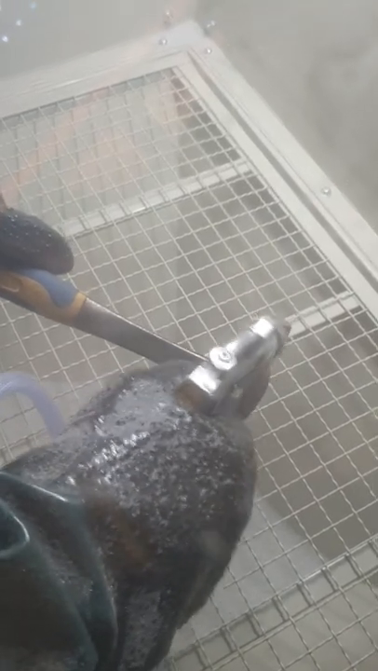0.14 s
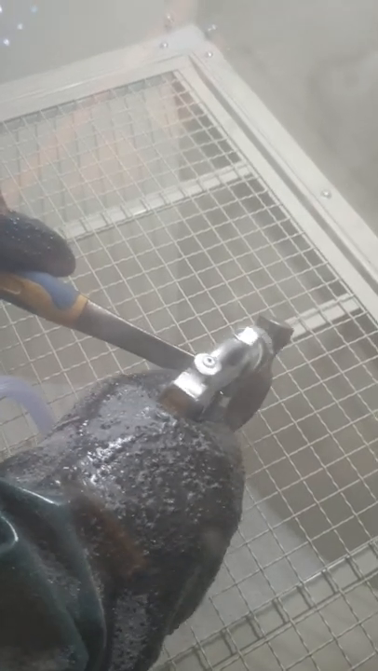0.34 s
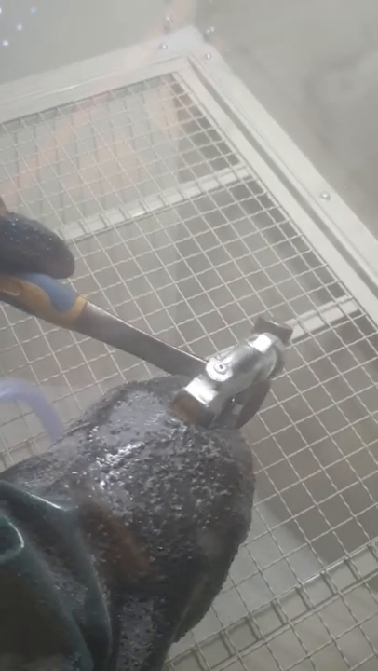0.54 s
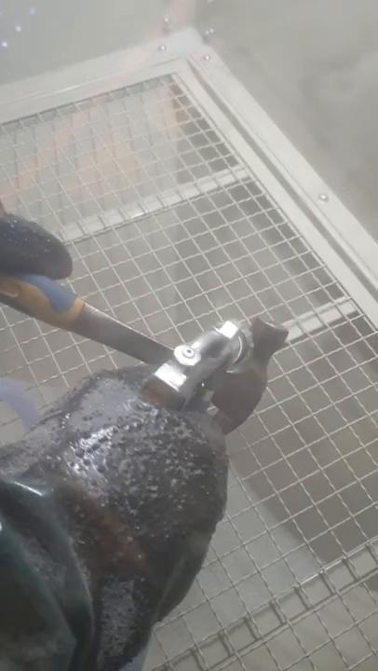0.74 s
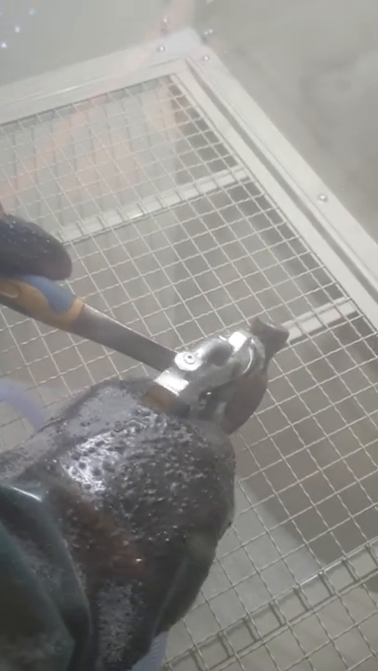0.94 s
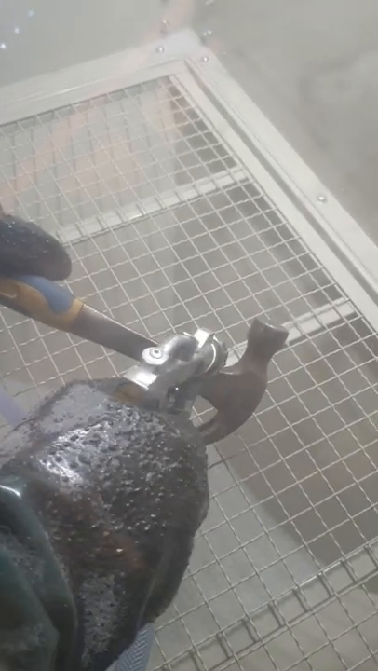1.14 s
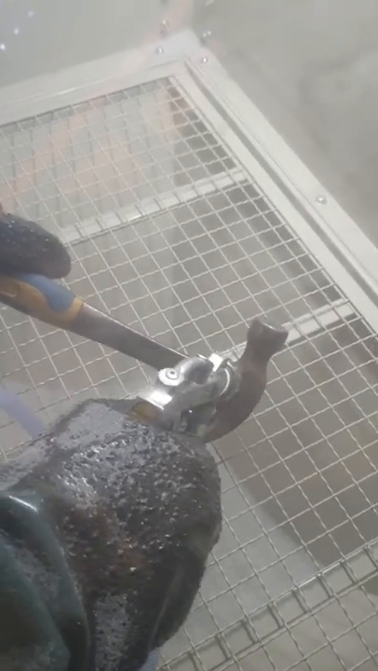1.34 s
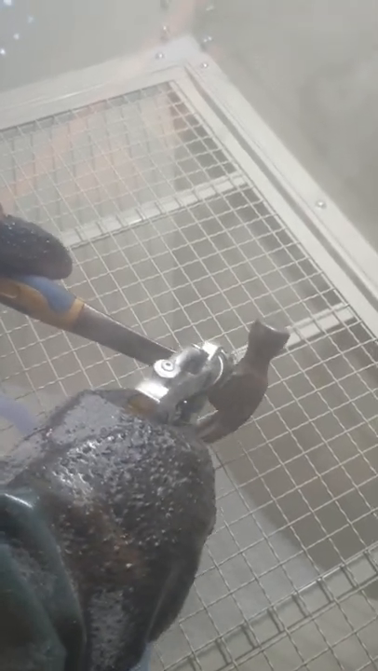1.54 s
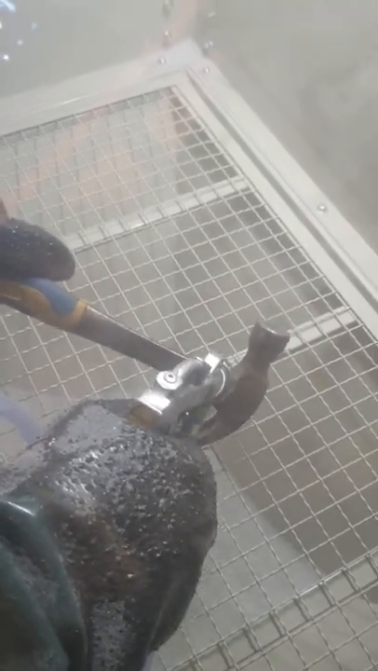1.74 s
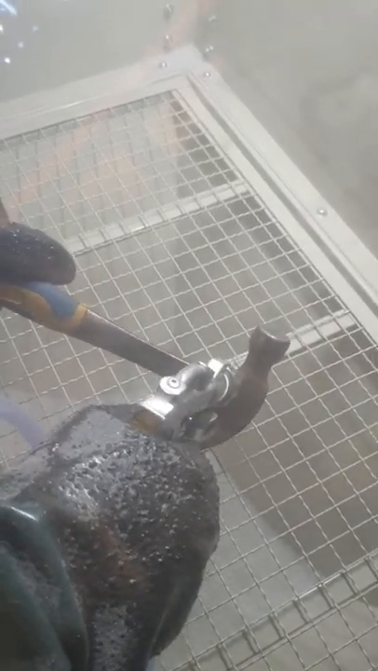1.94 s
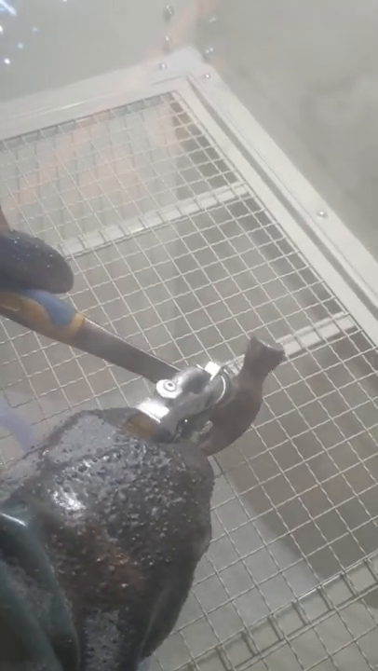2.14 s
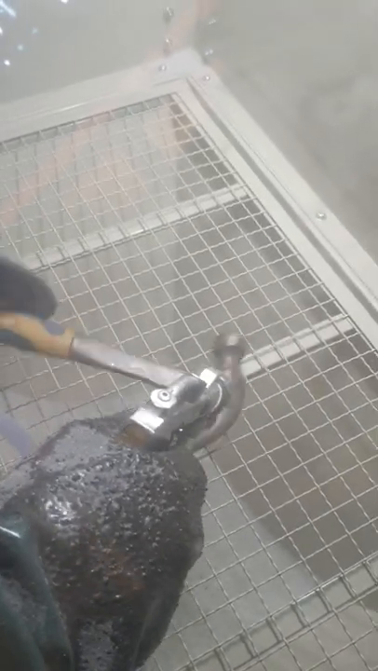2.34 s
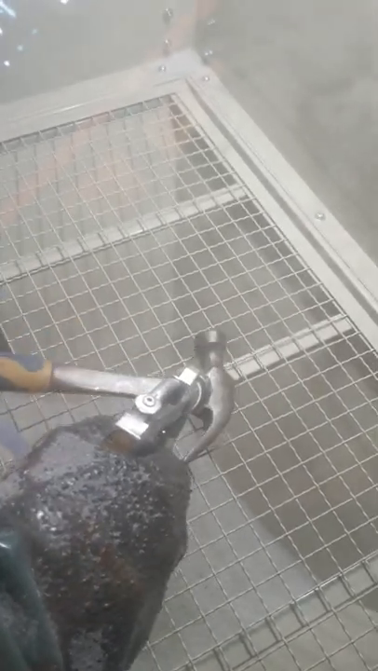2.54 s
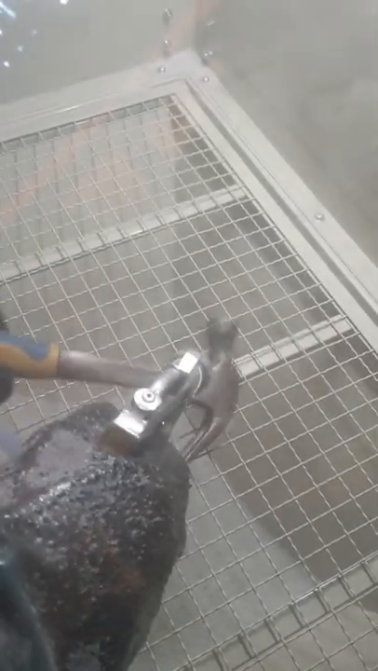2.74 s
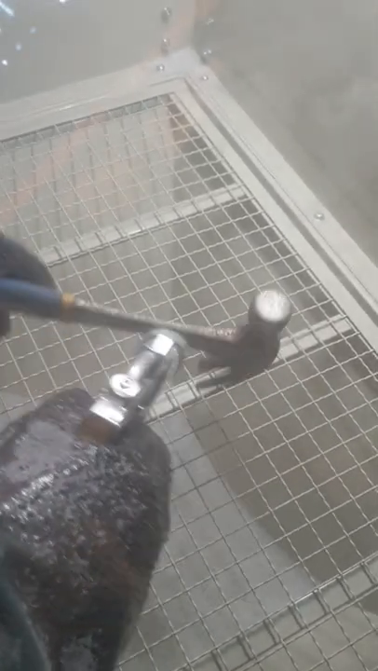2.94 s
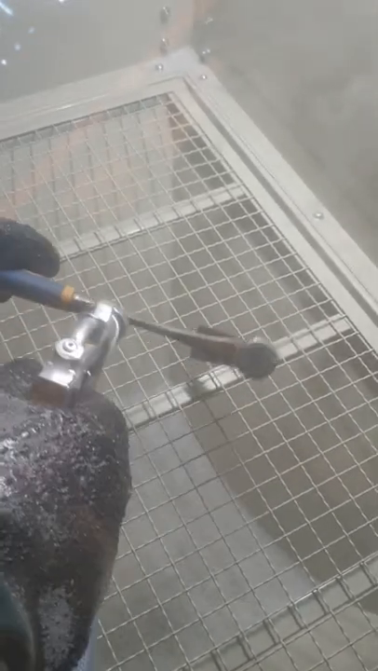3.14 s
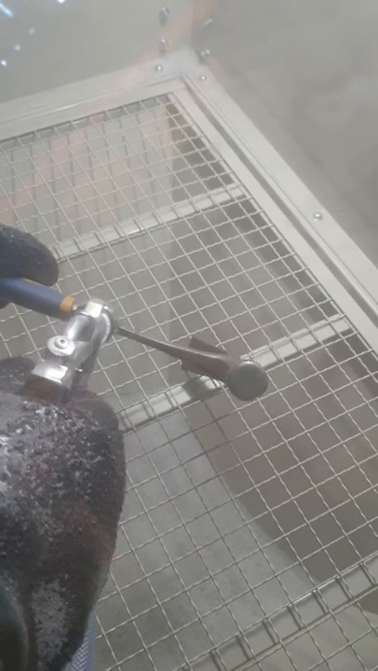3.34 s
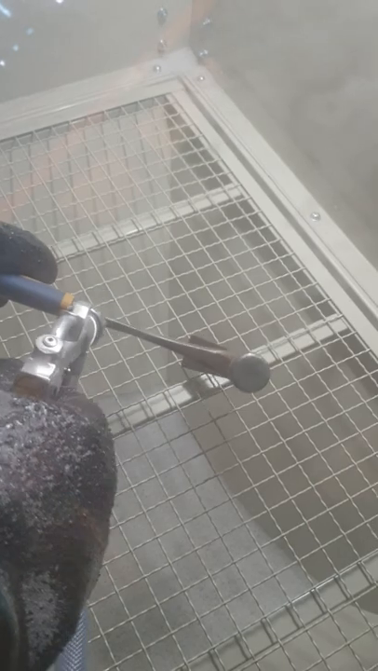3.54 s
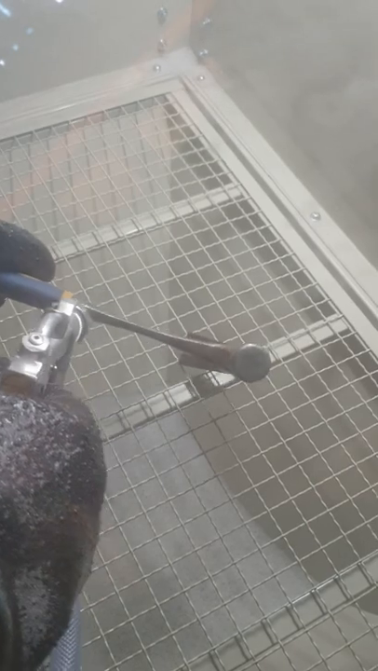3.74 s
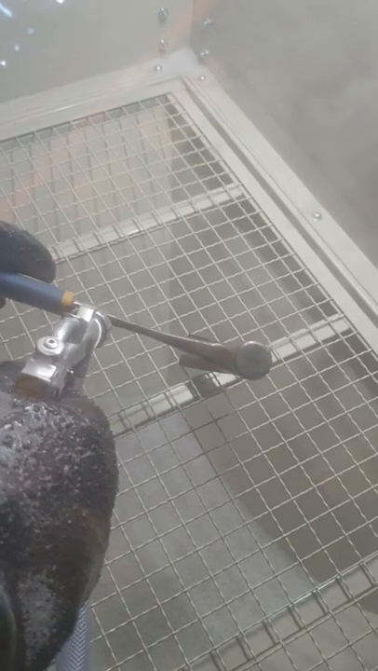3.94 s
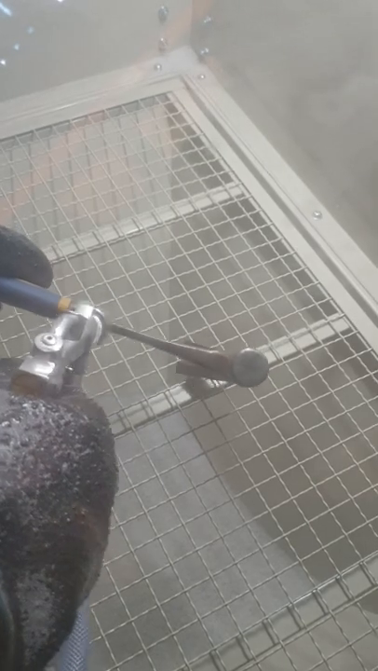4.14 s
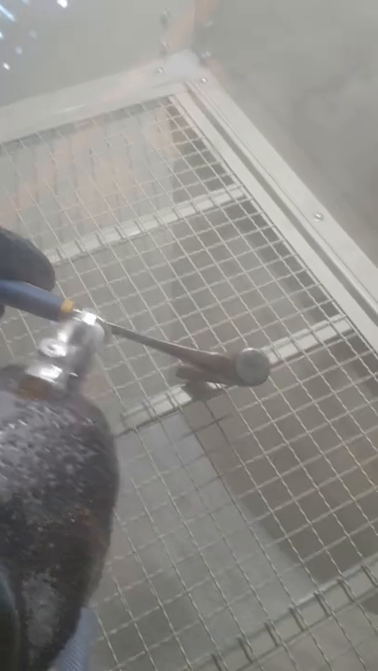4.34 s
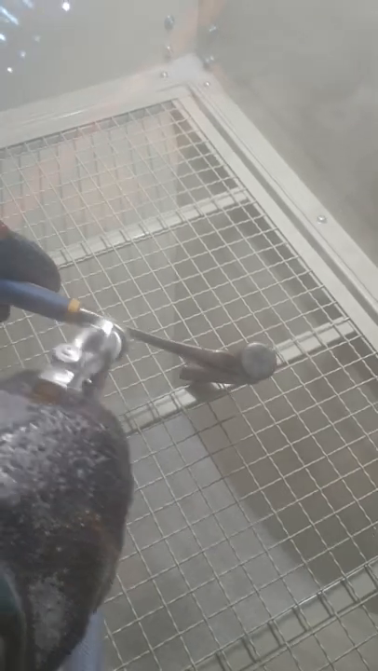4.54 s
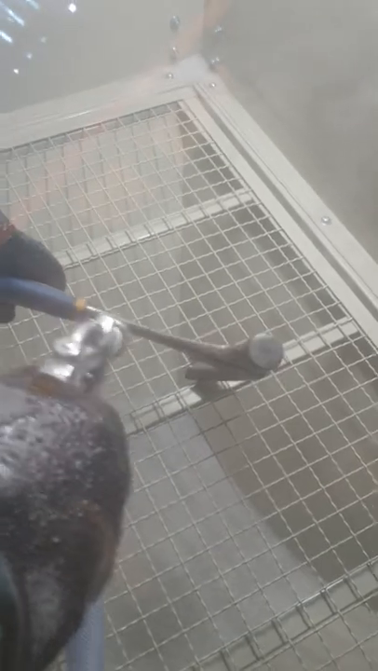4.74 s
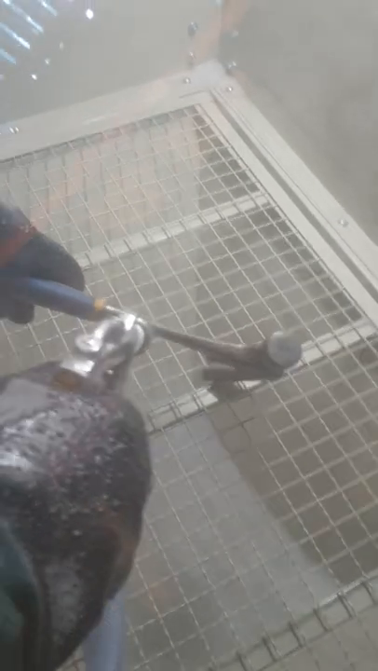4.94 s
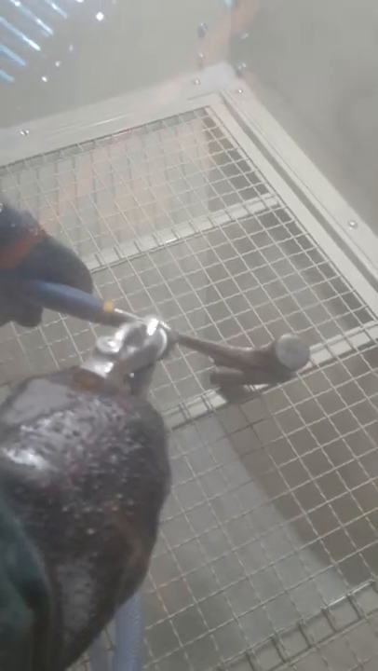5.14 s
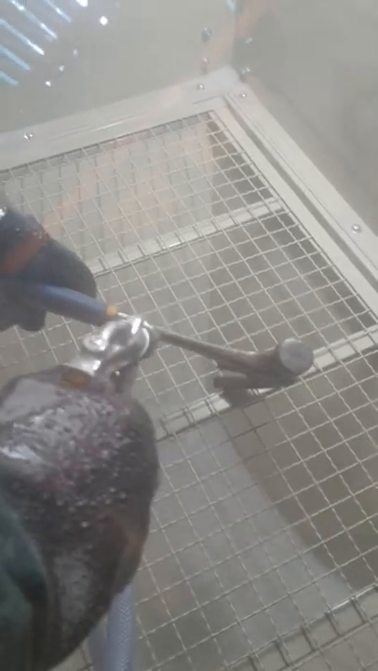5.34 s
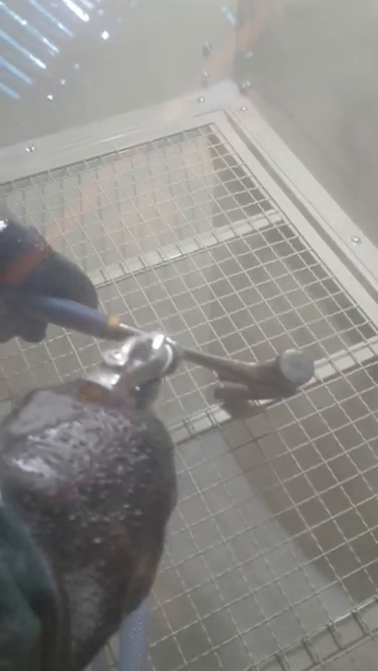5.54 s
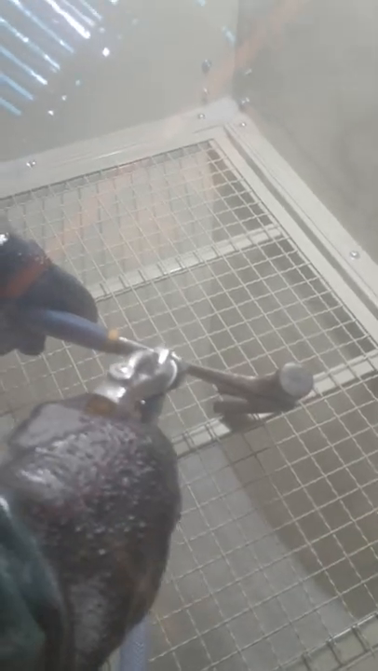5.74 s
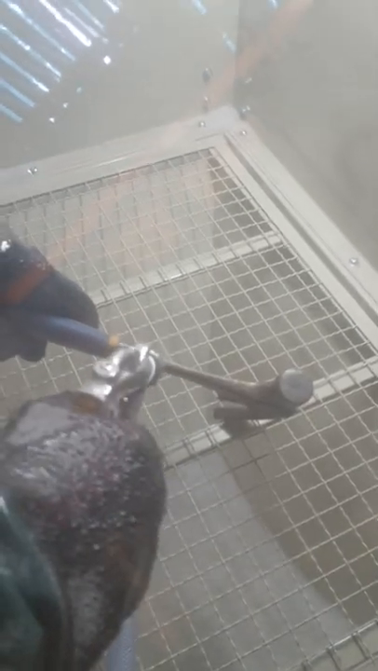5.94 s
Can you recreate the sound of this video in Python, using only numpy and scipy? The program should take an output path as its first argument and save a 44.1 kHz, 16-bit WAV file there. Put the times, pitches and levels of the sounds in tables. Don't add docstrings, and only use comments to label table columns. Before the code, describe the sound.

Inside a sheet-metal blasting cabinet, compressed air and grit hiss brightly in uneven surges against a steel hammer. The gun shuts off just after two seconds; the hammer thuds and clatters on the grate, panels boom and loose grit trickles. About a second later the blast snaps back. Close stereo phone pickup, treble-heavy, short metallic reverberation.

```python
import sys
import numpy as np
from scipy import signal
from scipy.fft import rfft, irfft, next_fast_len
from scipy.io import wavfile
from scipy.ndimage import uniform_filter1d

SR = 44100
rng = np.random.default_rng(int(sys.argv[2]) if len(sys.argv) > 2 else 0)


def how_loud(loudness_db):
    steps = np.asarray(loudness_db, float) / 20
    return 10 ** steps


def transcribe(signal):
    frames = np.atleast_2d(signal).T
    limited = np.clip(frames, -1, 1)
    pcm = np.round(limited * 32767).astype(np.int16)
    wavfile.write(sys.argv[1], SR, pcm)


N = 264151

# (frequency [Hz], density [dB per Hz])
HISS_SPECTRUM = [(4400, -46), (7500, -8), (9000, -3), (10500, 4.5), (12300, 13), (13500, 13.5), (14500, 10),
                 (15200, 13), (15650, 10.5), (15900, 3.5)]


def unit(x):
    return x / np.sqrt(np.mean(x ** 2) + 1e-20)


def along(points, hz):
    f, v = np.transpose(points)
    return np.interp(np.log(hz + 1), np.log(f + 1), v)


def curves(rows):
    s, *cols = np.transpose(rows)
    return [np.interp(np.arange(N) / SR, s, c) for c in cols]


def filtered(x, response, ring_s=0.25):
    m = next_fast_len(N + int(ring_s * SR))
    return irfft(rfft(x, m) * response(np.fft.rfftfreq(m, 1 / SR)), m)[..., :N]


def coloured(x, spectrum):
    return unit(filtered(x, lambda hz: how_loud(along(spectrum, hz))))


def drift(shape, bins, frames):
    field = uniform_filter1d(rng.standard_normal(shape), size=bins, axis=0)
    return unit(uniform_filter1d(field, size=frames, axis=1))


def patchy(depth_db, channels=1):
    z = signal.stft(rng.standard_normal((channels, N)), nperseg=512)[2]
    patches = drift(z.shape[1:], bins=8, frames=12)
    streaks = drift(z.shape[1:], bins=2, frames=24)
    gain_db = depth_db * (0.7 * patches + 0.8 * streaks)
    return signal.istft(z * how_loud(gain_db), nperseg=512)[1][:, :N]


def grains(per_s, spread_db):
    hit = rng.random(N) < per_s / SR
    size = np.minimum(rng.exponential(size=N), 4)
    return unit(hit * how_loud(spread_db * size) * rng.standard_normal(N))


def swells(rows, own=0, steady_db=-120):
    t, rows = np.arange(0, N + 64, 64) / SR, np.array(rows)
    s, db, rise_s, fall_s = rows[:, :4, None].transpose(1, 0, 2)
    below_db = 10 * np.where(t < s, (s - t) / np.abs(rise_s), (t - s) / np.abs(fall_s))
    each_db = db + own * rows[:, -1:] - below_db
    power = np.interp(np.arange(N) / SR, t, (how_loud(each_db) ** 2).sum(axis=0))
    return 10 * np.log10(power + how_loud(steady_db) ** 2)


def box(x, direct_db):
    # (frequency [Hz], t60 [s])
    cabinet_t60 = [(500, 0.39), (3000, 0.17), (12000, 0.19)]
    hz, t, z = signal.stft(rng.standard_normal((2, SR // 3)), SR, nperseg=256)
    decay_db = -60 * t / along(cabinet_t60, hz)[:, None]
    tail = signal.istft(z * how_loud(decay_db), SR, nperseg=256)[1]
    tail = tail / np.linalg.norm(tail, axis=1, keepdims=True)
    tail[:, 0] += how_loud(direct_db)
    tail = tail / np.linalg.norm(tail, axis=1, keepdims=True)
    return signal.fftconvolve(x[None], tail, axes=1)[:, :N]


def spray(spectrum, level_db, patchy_db, per_s, grain, compact, direct_db):
    noise = patchy(patchy_db, channels=3) + grain * grains(per_s, spread_db=1.6)
    point, *spread = coloured(noise, spectrum)
    gains = how_loud(np.atleast_2d(level_db))
    echoed = sum(box(gain * point, direct_db) for gain in gains)
    return np.sqrt(compact) * echoed + np.sqrt(1 - compact) * gains.sum(axis=0) * np.array(spread)


def panels(x):
    # (frequency [Hz], level [dB], t60 [s])
    panel_modes = [(57.73, 4, 1.66), (77.4, -8.5, 0.57), (86.5, -4, 0.96), (104.6, -0.5, 0.2),
                   (120, -3, 0.23), (164.3, -12.5, 0.9), (195, -11, 0.37), (227.4, -5.5, 0.3),
                   (259.2, 3.5, 0.36), (287, -2.5, 0.22), (340.4, -4, 0.43), (398, -10.5, 0.59),
                   (467, -9.5, 0.49), (492.3, -7.5, 0.46), (595, -16, 0.19), (697.5, -9, 0.084),
                   (819, -2, 0.17), (920, -5, 0.2), (1196, -7, 0.21)]
    shape = (len(panel_modes), 2, 1)
    tint = how_loud(rng.normal(0, 1.8, shape)) * np.exp(0.45j * rng.standard_normal(shape))

    def response(hz):
        low = hz[:len(hz) // 4]
        total = np.zeros((2, len(low)), complex)
        for (mode_hz, db, t60_s), port_tint in zip(panel_modes, tint):
            width_hz = np.log(1000) / (np.pi * t60_s)
            resonance = 20 * mode_hz / (mode_hz ** 2 - low ** 2 + 1j * low * width_hz)
            total += port_tint * how_loud(db) * resonance
        return np.pad(total, ((0, 0), (0, len(hz) - len(low))))

    return filtered(x, response, ring_s=2)


def workshop():
    # (frequency [Hz], level [dB])
    hall_spectrum = [(240, -31), (400, -26), (720, -6.5), (1800, -27), (2300, -19.5), (3500, -43.5),
                     (5300, -26.5), (8600, -43.5), (12000, -40), (15000, -43.5), (15900, -51)]
    return how_loud(-61) * coloured(patchy(1.2, channels=2), hall_spectrum)


def dust():
    # (frequency [Hz], level [dB])
    sand_spectrum = [(350, -28), (600, -17.5), (856, -12.5), (968, -18), (1140, -14.5), (1500, -25.5),
                     (1560, -32), (1840, -22), (3050, -29), (5410, -28.5), (8970, -46.5), (12100, -42),
                     (15700, -46)]
    # (peak time [s], level [dB], 10 dB rise [s], 10 dB fall [s], fine dust over it [dB])
    trickle_rows = [
        (2.3, -54, .08, .15, -8),
        (2.433, -42, .01, .07, -6),
        (2.503, -52, .004, .02, 0),
        (2.556, -45, .025, .12, -15),
        (2.66, -50, .01, .07, -14),
        (2.801, -44, .004, .08, -20),
        (2.93, -61, .06, .1, -22),
        (3.174, -63, .002, .05, 7),
    ]
    coarse = [p for p in sand_spectrum if p[0] < 9000] + [(11000, -96.0)]
    sand_db = swells(trickle_rows) + 0.1
    fine_db = swells(trickle_rows, own=0.86) + 0.1
    sand = spray(coarse, sand_db, patchy_db=-4.0, per_s=430, grain=0.27, compact=0.35, direct_db=-1.0)
    fine = spray(HISS_SPECTRUM, fine_db, patchy_db=-1.5, per_s=1200, grain=0.38, compact=0.3, direct_db=6)
    return sand + fine


def rumble():
    # (frequency [Hz], level [dB])
    low_spectrum = [(15, -37), (28, 5), (59, 4), (263, -6.5), (362, -16.5), (397, -12.5), (430, -16.5),
                    (525, -25.5), (600, -18.5), (780, -30.5), (1320, -120)]
    # (peak time [s], level [dB], 10 dB rise [s], 10 dB fall [s])
    shove_rows = [
        (1.85, -40, 1, -4),
        (2.22, -36, -0.2, 0),
        (2.48, -23.5, 0, 0.2),
        (2.7, -33.5, 0.26, 0.36),
        (3.5, -41, 0.7, 0.4),
    ]
    shake_db = swells(shove_rows, steady_db=-43.5)
    a, b = patchy(0.7, channels=2)
    plain = coloured(np.array([a + 0.31 * b, a - 0.14 * b]), low_spectrum)
    ringing = panels(rng.standard_normal(N))
    ringing = unit(filtered(ringing, lambda hz: 1j * hz / (60 + 1j * hz) / (1 + 1j * hz / 500) ** 2))
    return how_loud(shake_db) * unit(plain + 0.6 * ringing)


def knocks():
    # (time [s], boom level [dB], clack over boom [dB], contact [ms])
    knock_rows = [(1.792, -41, 5, 0.37), (2.185, -32, -5, 0.84), (2.431, -24.5, 5, 0.42),
                  (2.440, -13, -17, 0.93), (2.448, -12.5, -22, 1.12), (2.549, -23.5, -5, 0.88),
                  (2.61, -23, -12, 1.6), (2.659, -24, -12, 1.24), (2.69, -32, -21, 1.3),
                  (2.797, -35, -7, 1.18), (2.819, -33.5, -1.5, 1.2), (2.949, -41, -6, 2.4)]
    push, clack = np.zeros(N + SR), np.zeros(N + SR)
    t = np.arange(SR // 4) / SR
    for s, boom_db, clack_db, contact_ms in knock_rows:
        ms = max(contact_ms, 0.3)
        u = t / (ms / 1000)
        start = round(s * SR)
        push[start:][:len(t)] += how_loud(boom_db) * u * np.exp(1 - u) / ms
        envelope = how_loud(boom_db + clack_db - 60 * t / 0.14) * (1 - np.exp(-t / 0.0039))
        clack[start:][:len(t)] += envelope * rng.standard_normal(len(t))

    def grate_tone(hz):
        resonance = 1 / (1 + 1j * hz / 1000 - (hz / 1150) ** 2)
        return resonance ** 2 * (1j * hz / (200 + 1j * hz))

    tone = filtered(clack[:N], grate_tone)
    return how_loud(8.5) * panels(push[:N]) + how_loud(8) * box(tone, direct_db=3.5)


def valve(pulled_s, let_go_s):
    open_db_per_s, shut_db_per_s = 1700, 520
    bleed_db, bleed_db_per_s, bleed_s = -22, 28, 0.225
    t = np.arange(N) / SR
    after = np.maximum(t - let_go_s, 0)
    bleed = bleed_db - bleed_db_per_s * after - shut_db_per_s * np.maximum(after - bleed_s, 0)
    shutting = np.maximum(-shut_db_per_s * after, bleed)
    opening = np.minimum(open_db_per_s * (t - pulled_s), 0)
    return np.maximum(shutting + opening, -120)


def gun():
    # (frequency [Hz], level [dB])
    grit_spectrum = [(2530, -29.5), (4300, -1), (4550, -4.5), (5130, -1), (6000, -2.5), (7560, -7),
                     (8500, -15), (11000, -62), (18700, -120)]
    # (frequency [Hz], level [dB])
    grate_spectrum = [(1120, -24), (1900, -12.5), (2310, -8), (2490, 1), (2690, -2.5), (3110, -0.5),
                      (3210, -4), (3690, 0.5), (4200, -2.5), (5460, -17), (9240, -120)]
    # (frequency [Hz], level [dB])
    roar_spectrum = [(240, -28.5), (400, -3), (506, -10.5), (645, -12.5), (728, -7), (777, -7), (922, -2.5),
                     (1250, -5), (1780, -7.5), (2200, -5), (2860, -17.5), (4840, -120)]
    # (fully pulled [s], let go [s])
    trigger_pulls = [
        (-.1, 2.194),
        (3.232, 6.2),
    ]
    # (time [s], rebound off metal [dB], into the hollow [dB])
    aim_points = [(0, -0.6, -0.5), (0.29, -1.5, 1.0), (0.82, -2.1, 1.7), (1.17, -0.5, 2.9),
                  (1.24, -9.7, 3.0), (1.49, 1.6, -1.3), (1.59, -1.0, 4.1), (1.89, 4.6, 0.6),
                  (2.2, 0.9, 3.4), (3.3, -2.7, 0.2), (3.45, -1.0, 1.6), (3.49, 3.4, 0.4), (4.15, 2.5, -0.5),
                  (4.21, -0.2, 2.0), (4.51, 1.9, -1.6), (5.22, 1.5, -2.6), (5.61, 2.1, -2.9),
                  (5.99, 4.3, -4.5)]
    # (peak time [s], hiss level [dB], last 10 dB of rise [s], first 10 dB of fall [s],
    # grate over hiss [dB])
    slug_rows = [(0.201, -30.7, 0.297, 0.292, -15.0), (0.33, -28.1, 0.027, 0.058, -8.9),
                 (0.551, -22.2, 0.108, 0.127, -12.1), (0.792, -22.1, 0.167, 0.226, -10.4),
                 (0.917, -24.8, 0.102, 0.194, -17.5), (1.095, -28.5, 0.032, 0.243, -5.6),
                 (1.363, -36.2, 0.048, 0.082, 1.6), (1.449, -27.9, 0.142, 0.125, -16.3),
                 (1.515, -34.2, 0.019, 0.032, -0.2), (1.675, -24.4, 0.057, 0.06, -6.9),
                 (1.953, -23.5, 0.03, 0.056, -7.9), (2.17, -30.5, 0.006, 0.047, -5.7),
                 (3.249, -18.0, 0.033, 0.09, -12.6), (3.548, -22.0, 0.065, 0.132, -10.9),
                 (3.746, -23.0, 0.216, 0.081, -18.3), (3.968, -21.2, 0.063, 0.073, -12.2),
                 (4.322, -22.7, 0.033, 0.121, -10.0), (4.542, -19.5, 0.061, 0.201, -12.9),
                 (4.808, -25.7, 0.297, 0.225, -14.8), (4.86, -31.2, 0.071, 0.156, -2.7),
                 (4.991, -23.5, 0.07, 0.223, -9.4), (5.359, -29.5, 0.034, 0.088, -9.3),
                 (5.475, -21.9, 0.072, 0.075, -11.3), (5.83, -22.4, 0.131, 0.048, -14.8)]
    air_db, grit_db, grate_over_db, roar_over_db = -32, -8.6, -8.9, -13.1
    slug_grit_db = -8.8
    aim_db, hollow_db = curves(aim_points)

    hiss_db = swells(slug_rows, steady_db=air_db + 0.5 * aim_db)
    steel_steady_db = air_db + grit_db - slug_grit_db + 0.44 * aim_db
    steel_db = slug_grit_db + swells(slug_rows, steady_db=steel_steady_db) + 0.4 * aim_db
    grate_steady_db = air_db + grate_over_db + 0.65 * aim_db
    grate_db = swells(slug_rows, own=1, steady_db=grate_steady_db) + 0.5 * aim_db
    roar_db = air_db + roar_over_db + hollow_db + 0.5 * (grate_db - air_db - grate_over_db)
    open_db = np.array([valve(pulled_s, let_go_s) for pulled_s, let_go_s in trigger_pulls])

    hiss = spray(HISS_SPECTRUM, open_db + hiss_db, patchy_db=1.5, per_s=6800, grain=0.27,
                 compact=0.18, direct_db=2.0)
    steel = spray(grit_spectrum, open_db + steel_db, patchy_db=1.07, per_s=4600, grain=0.24,
                  compact=0.62, direct_db=-8.5)
    grate = spray(grate_spectrum, open_db + grate_db, patchy_db=1.7, per_s=5000, grain=0.14,
                  compact=0.78, direct_db=-5.5)
    roar = spray(roar_spectrum, open_db + roar_db, patchy_db=1.5, per_s=4700, grain=0.053,
                 compact=0.86, direct_db=1.0)
    return how_loud(0.9) * hiss + how_loud(-0.27) * steel + how_loud(-0.6) * grate + how_loud(-1.06) * roar


def scene():
    pan = how_loud([[-2.5], [2.5]])
    return workshop() + dust() + (rumble() + knocks()) * pan + gun()


def dropouts(x):
    # (frequency [Hz], threshold [standard deviations])
    rarity = [(1200, 4), (1800, 1.8), (2600, 2.3), (3800, 2), (4350, 1.1), (4800, 2.1), (6800, 2.1),
              (7400, .6), (8000, 1.4), (9500, 1.1), (10500, 2.3), (12000, 4)]
    hz, _, z = signal.stft(x, SR, nperseg=1024)
    lost = drift(z.shape[1:], bins=4, frames=8) > along(rarity, hz)[:, None]
    return signal.istft(z * how_loud(-25 * lost), SR, nperseg=1024)[1][:, :N]


def roll_off(x):
    return signal.sosfilt(signal.butter(12, 15800, fs=SR, output="sos"), x)


def record(dry):
    # (frequency [Hz], left minus right [dB])
    port_colour = [(60, 3), (300, 2), (700, -2.5), (1200, -6), (1600, -3.5), (2500, -6), (4000, -3.5),
                   (5200, -7.5), (6600, -7.5), (7400, -1.5), (8600, 9), (9600, 3), (12000, -2), (14000, -4),
                   (15600, 9)]
    lag_samples = -13
    top_hz, edge_hz = 15780, 80
    notch_hz, notch_width_hz, notch_depth = 4310, 79, 0.43
    side = np.array([[0.5], [-0.5]])

    def response(hz):
        ports = how_loud(along(port_colour, hz) * side) * np.exp(-2j * np.pi * hz * lag_samples / SR * side)
        band = (1j * hz / (44 + 1j * hz)) ** 4 * np.clip((top_hz - hz) / edge_hz, 0, 1)
        notch = 1 - notch_depth / (1 + ((hz - notch_hz) / notch_width_hz) ** 2)
        return ports * band * notch

    heard = dropouts(filtered(dry, response))
    return roll_off(heard)


dry = scene()
out = record(dry)
transcribe(out)
```